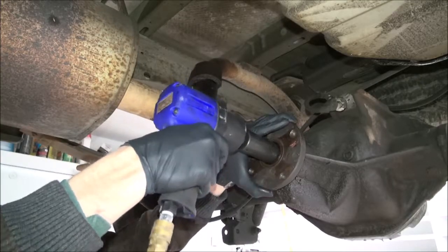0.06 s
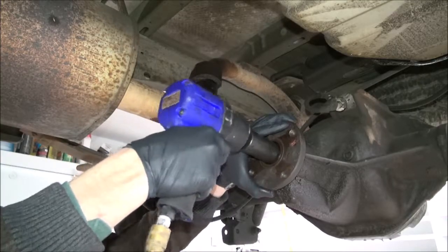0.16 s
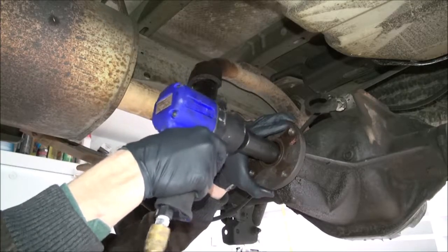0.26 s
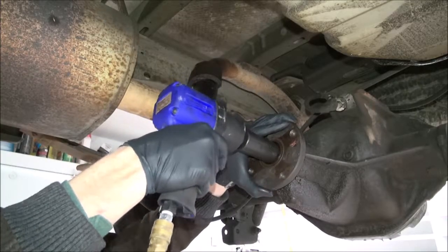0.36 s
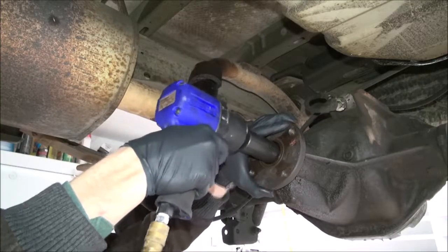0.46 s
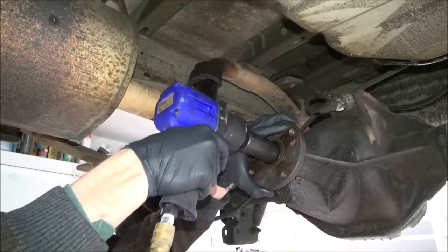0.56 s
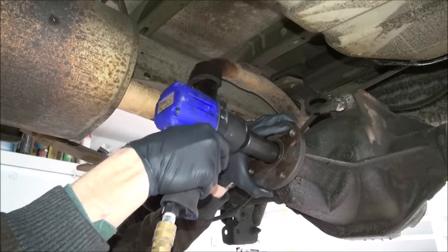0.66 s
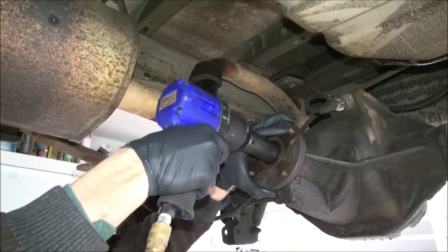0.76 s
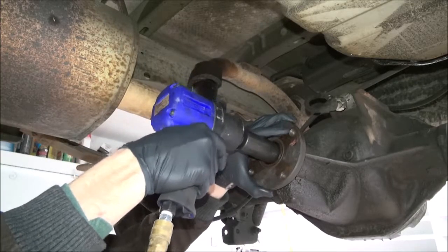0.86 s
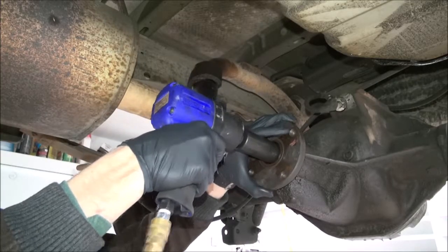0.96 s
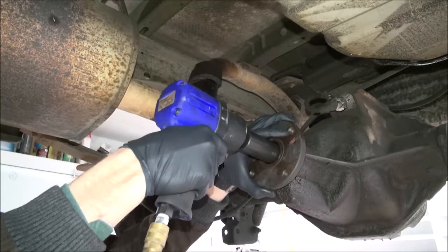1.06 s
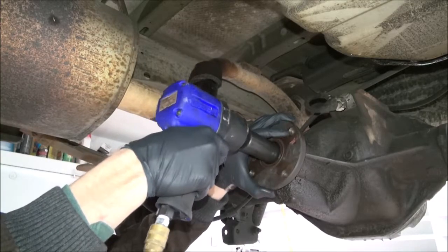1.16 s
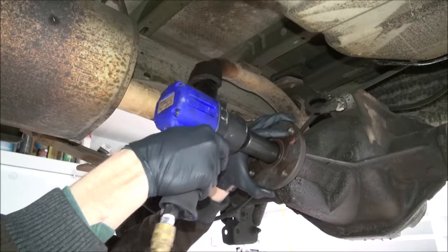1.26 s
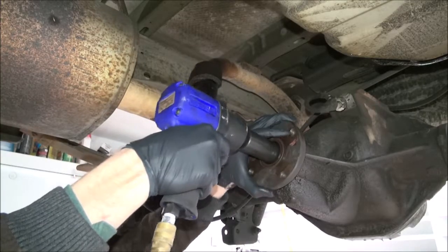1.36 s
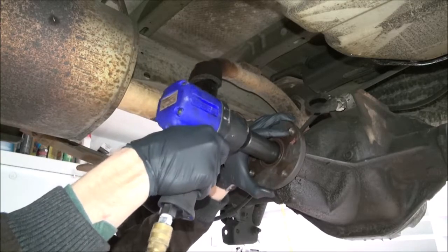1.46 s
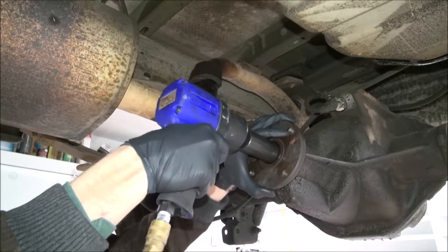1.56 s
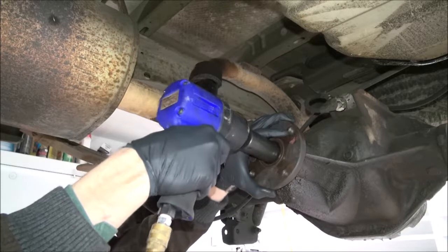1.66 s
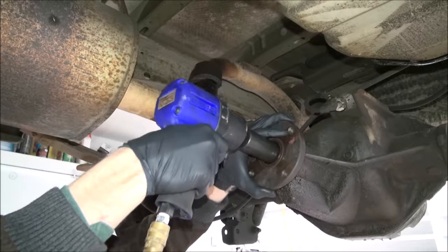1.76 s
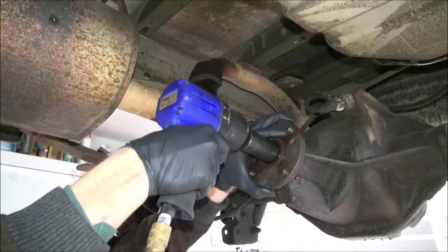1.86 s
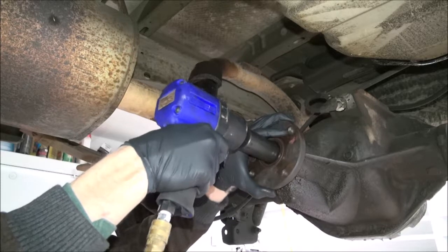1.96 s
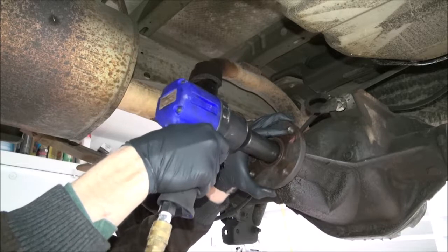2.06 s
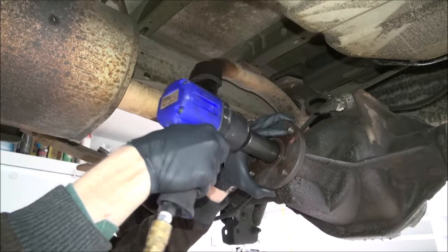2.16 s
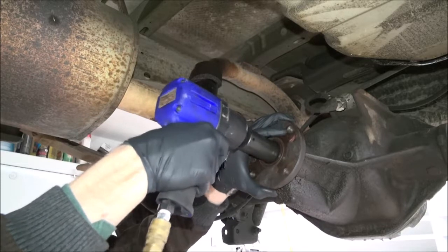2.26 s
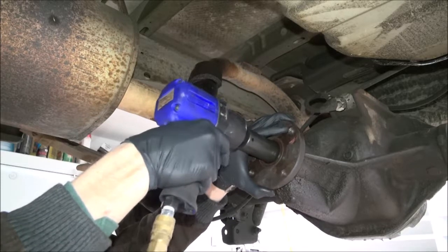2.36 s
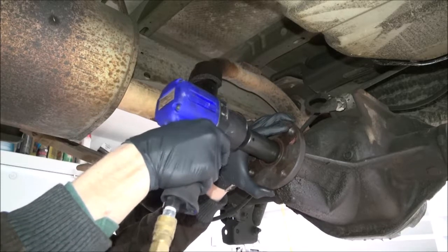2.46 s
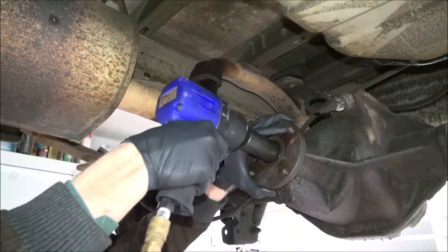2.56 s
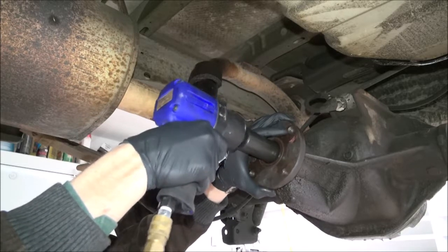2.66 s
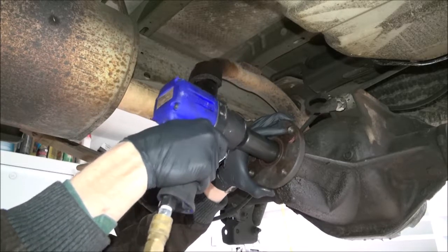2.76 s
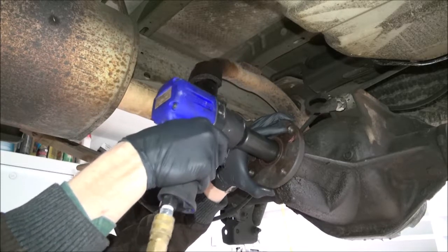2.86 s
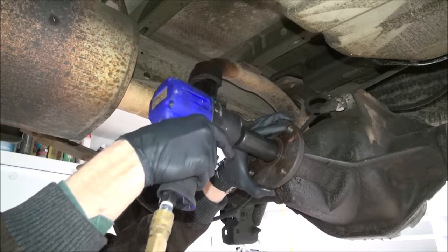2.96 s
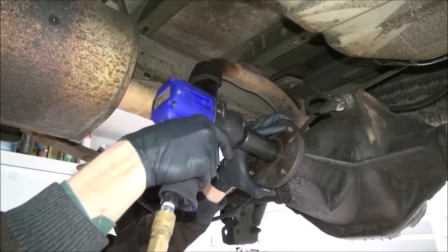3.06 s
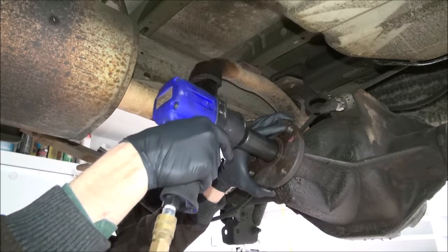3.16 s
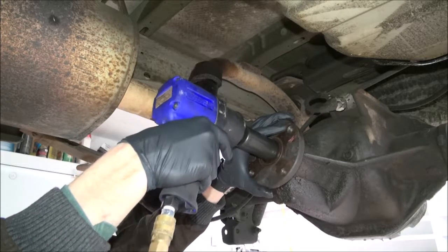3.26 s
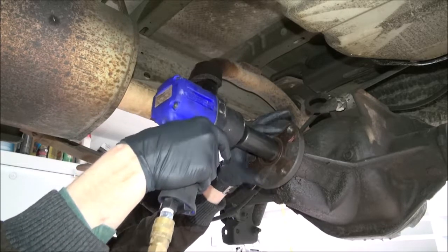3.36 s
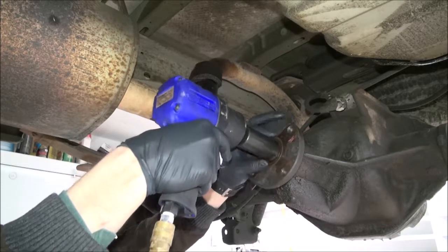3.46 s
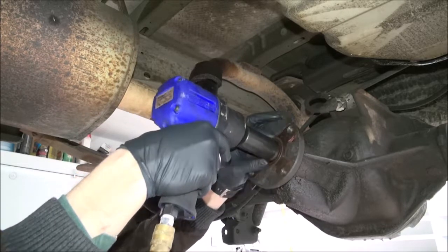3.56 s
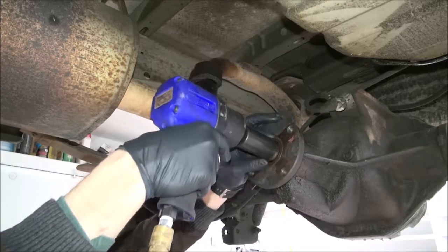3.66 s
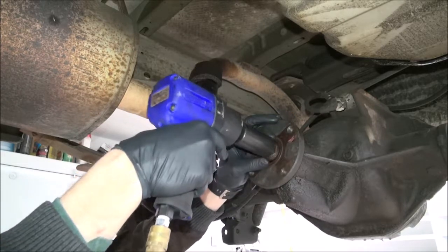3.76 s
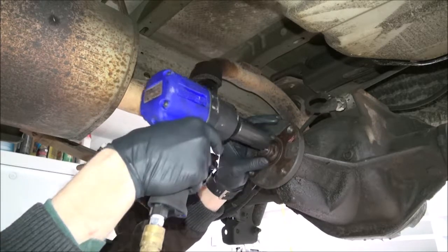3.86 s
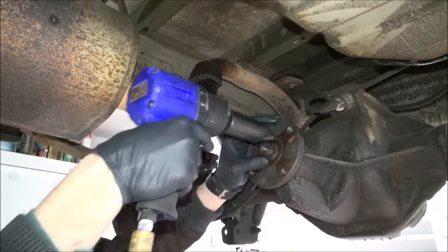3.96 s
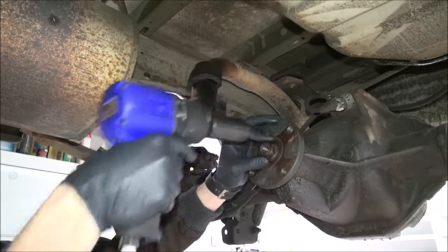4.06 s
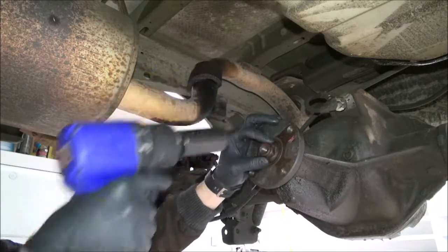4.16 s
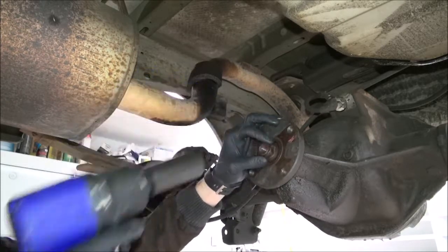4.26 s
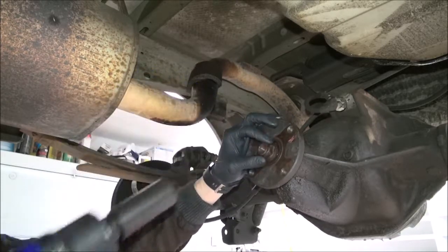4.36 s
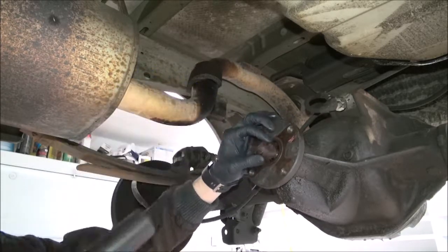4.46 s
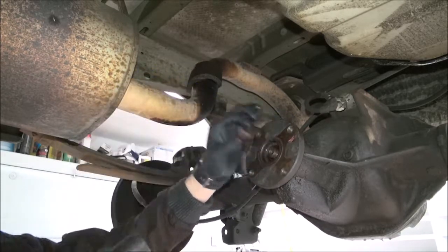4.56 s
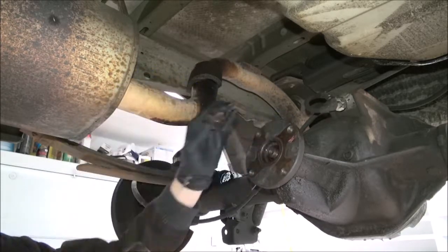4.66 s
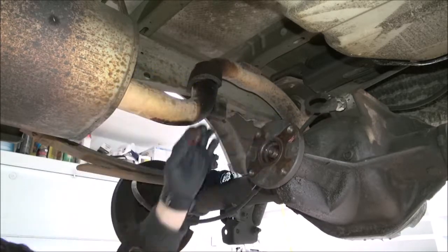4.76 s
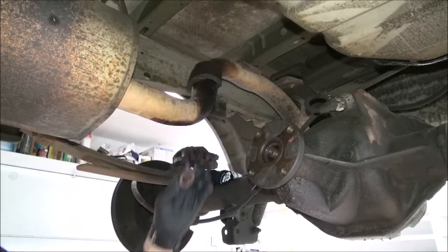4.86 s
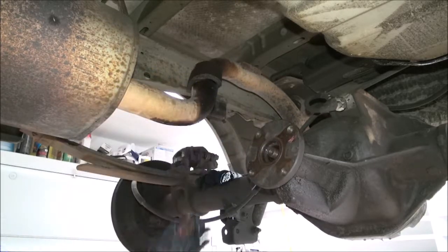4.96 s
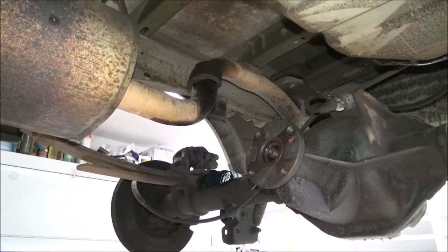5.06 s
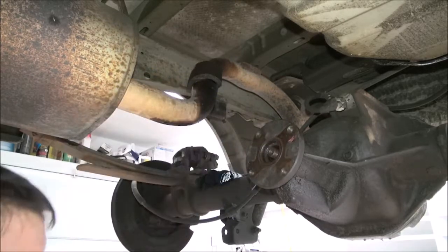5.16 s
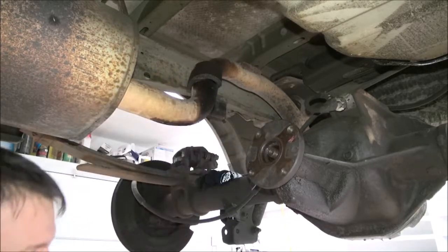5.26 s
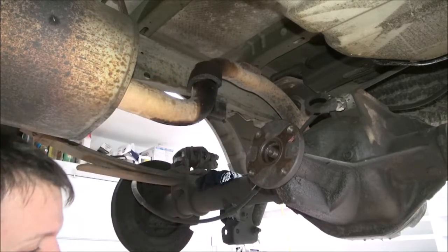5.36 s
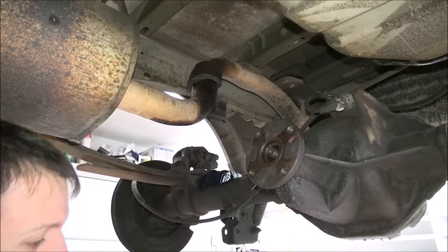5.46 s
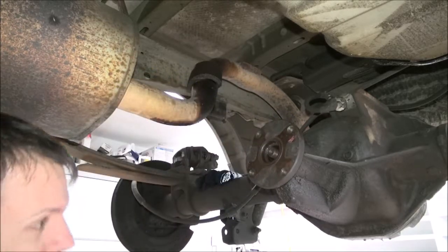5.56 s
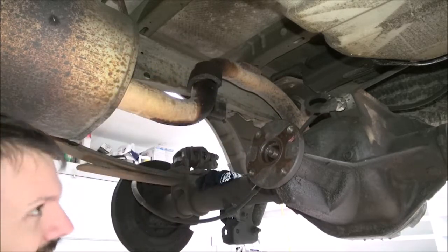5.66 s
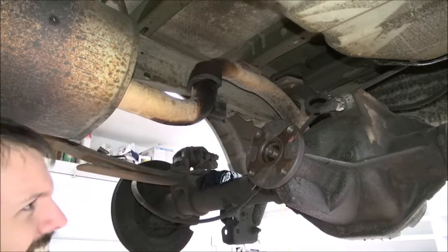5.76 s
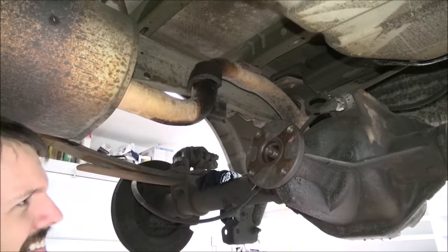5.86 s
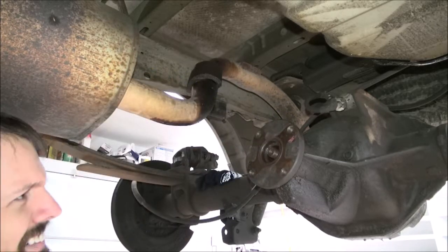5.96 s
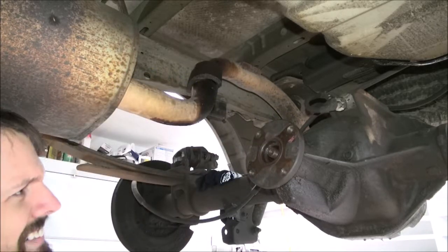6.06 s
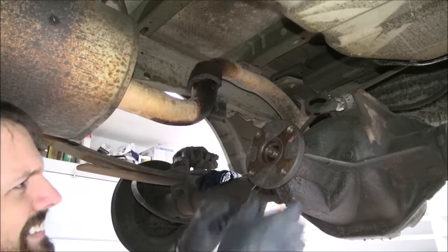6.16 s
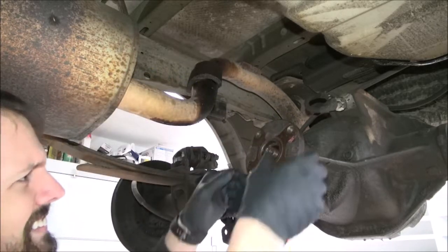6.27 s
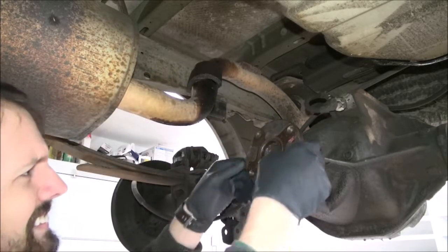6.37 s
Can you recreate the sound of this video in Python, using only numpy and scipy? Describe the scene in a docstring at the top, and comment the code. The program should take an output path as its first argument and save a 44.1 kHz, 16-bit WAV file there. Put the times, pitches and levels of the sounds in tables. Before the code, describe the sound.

Close by in a garage, an air impact wrench hammers on a screw under a car in several short bursts, with roaring air, a rattling socket and ringing steel. The motor then spins free, its whine rising and falling away as the loose socket clinks. Quiet taps and glove rustles follow over a low hum, and a steel part drops with a bright clang. The room adds a short echo.

```python
"""In a humming garage an air impact wrench hammers a puller screw under a car in short bursts, 26 blows
a second: its exhaust roars, its socket rattles and the axle rings. Near 2.6 s the motor spins free, and
its puffs of air make a whine that rises, then falls as it coasts to rest. Quiet taps and rustles of
handling follow, and the background noise steps up abruptly. At 5.75 s a steel part falls with a clang.
The garage echoes the knocks, and a limiter holds down the loudest peaks."""
import sys
import numpy as np
from scipy import signal
from scipy.fft import rfft, irfft, next_fast_len
from scipy.io import wavfile
from scipy.ndimage import uniform_filter1d, minimum_filter1d

SR = 44100
rng = np.random.default_rng(int(sys.argv[2]) if len(sys.argv) > 2 else 0)


def dump(signal):
    """Clip the signal to [-1, 1] and save it as 16-bit WAV at the path in sys.argv[1]."""
    limited = np.clip(np.atleast_2d(signal).T, -1, 1)
    pcm = np.round(limited * 32767).astype(np.int16)
    wavfile.write(sys.argv[1], SR, pcm)


N = 283122
TOP_HZ = 15950  # the highest frequency kept


def amp(db):
    """Turn decibels into a number to multiply by."""
    return 10 ** (np.asarray(db) / 20)


def along(points, hz):
    """Read between the rows of a (frequency, value) table, on a log frequency scale."""
    freqs, values = np.transpose(points)
    return np.interp(np.log(hz + 1), np.log(freqs + 1), values)


def curve(points):
    """Join the rows of a (time, value) table with straight lines, one value per sample."""
    return np.interp(np.arange(N) / SR, *np.transpose(points))


def filtered(x, response):
    """Turn each frequency of x up or down by the gain response(hz)."""
    n = x.shape[-1]
    padded = next_fast_len(n + 4096)
    return irfft(rfft(x, padded) * response(np.fft.rfftfreq(padded, 1 / SR)), padded)[..., :n]


def coloured(x, spectrum, size=4096):
    """Give x the tone colour of a table; white noise keeps its overall power."""
    cepstrum = irfft(np.log(amp(along(spectrum, np.fft.rfftfreq(size, 1 / SR)))))
    cepstrum[1:size // 2] *= 2  # folded so that the filter rings only after a hit
    cepstrum[size // 2 + 1:] = 0
    response = irfft(np.exp(rfft(cepstrum)))
    response /= np.linalg.norm(response)
    return signal.fftconvolve(x, np.atleast_2d(response), axes=1)[:, :x.shape[1]]


# how wide the noise sounds: (frequency [Hz], side level over middle [dB])
STEREO_WIDTH = [(60, -15.5), (250, -25.5), (2400, -23.5), (4400, -11), (6500, -3.5), (8200, 3),
                (15000, 1.5)]
def noise(n):
    """Stereo noise: left and right are alike in the bass and differ in the treble."""
    mid, side = rng.standard_normal((2, n))
    side = filtered(side, lambda hz: amp(along(STEREO_WIDTH, hz)))
    return np.array([mid + side, mid - side])


def add(track, s, sound):
    """Mix a sound into a track from second s on."""
    start = max(round(s * SR), 0)
    part = track[..., start:start + sound.shape[-1]]
    part += sound[..., :part.shape[-1]]


def ring(modes, t, scatter_db, count=1):
    """Struck steel rings with its own fading tones, in a slightly new mix for each blow."""
    hz, db, t60 = np.transpose(modes)  # t60, the fade time: seconds to drop by 60 dB
    strength = amp(db + scatter_db * rng.standard_normal((count, len(hz))))
    phase = np.exp(2j * np.pi * rng.random(strength.shape))
    tones = amp(-60 * t / t60[:, None]) * np.exp(2j * np.pi * hz[:, None] * t)
    return np.squeeze(((strength * phase) @ tones).imag)


# how long the garage echoes: (frequency [Hz], fade time [s])
ECHO_FADE = [(100, 0.17), (300, 0.32), (1500, 0.41), (5000, 0.32), (14000, 0.16)]
def garage(x, wet_db, delay_s=.004):
    """Add the echo from the walls and the car's underside; middle frequencies last longest."""
    hz, t, bands = signal.stft(noise(SR * 3 // 4), SR, nperseg=256)
    tail = signal.istft(bands * amp(-60 * t / along(ECHO_FADE, hz)[:, None]), SR, nperseg=256)[1]
    tail /= np.linalg.norm(tail.mean(0))
    tail = np.pad(tail, ((0, 0), (round(delay_s * SR), 0)))
    return x + amp(wet_db) * signal.fftconvolve(x, tail, axes=1)[:, :N]


# tone colour of the quiet garage: (frequency [Hz], level [dB])
HUM_COLOUR = [(12, -63.5), (20, -32), (130, -2.5), (172, -16), (227, -5), (261, -17.5), (431, -15),
              (1950, -25), (15800, -48.5)]
def room_hum(level_db=-70.5):
    """A steady low hum lies under everything."""
    return amp(level_db) * coloured(noise(N), HUM_COLOUR)


# tone colours of the escaping air, high hiss and low roar: (frequency [Hz], level [dB])
HISS_COLOUR = [(350, -31.5), (600, 2.5), (679, -7.5), (789, -4), (1080, -0.5), (1650, -1), (2170, -2),
               (2600, 1), (3230, -4.5), (3650, 3), (4020, -7.5), (6230, -8.5), (8080, -19), (12000, -17),
               (15800, -28.5)]
ROAR_COLOUR = [(18, -57.5), (30, -25), (65, -24.5), (114, -1.5), (174, -9), (229, 2), (328, -3), (361, -2),
               (455, -3), (583, -2), (678, -9), (800, -10.5), (1040, -34), (1760, -120)]
# trigger pulls: (press [s], release [s], hiss level [dB], roar level [dB], roar pulsing [dB])
TRIGGER_PULLS = [(-0.06, 0.008, -12.5, -22, 0), (0.095, 0.302, -13.5, -24, 5.5),
                 (0.424, 0.585, -14, -21.5, 3.5), (0.715, 0.876, -14.5, -21.5, 3),
                 (0.97, 1.256, -12.5, -22.5, 4), (1.395, 2.273, -14.5, -24.5, 3.5),
                 (2.522, 2.825, -18.5, -28, 5.5)]
def exhaust(hiss_db=-3.5, roar_db=-0.5, rattle_db=-11, rattles_per_s=260, rattle_t60=0.018, dip_db=-2.5):
    """Air roars out of the wrench and is choked by each blow; the socket rattles in between."""
    presses, _, hiss_levels, roar_levels, pulse_depths = np.transpose(TRIGGER_PULLS)
    hiss_gain = airflow(hiss_levels, sag_db_per_s=6, fall_db_per_s=178)
    fizz_gain = airflow(hiss_levels, sag_db_per_s=6, fall_db_per_s=227.5)  # the treble dies first
    roar_gain = airflow(roar_levels, sag_db_per_s=2.5, fall_db_per_s=96.5)
    time, cycle = np.arange(N) / SR, hammer_cycle()
    depth_db = pulse_depths[np.searchsorted(presses, time) - 1]
    chuff = amp(-depth_db * (cycle > 0) * np.sin(2 * np.pi * (cycle + 0.027)))
    swing_dip = amp(dip_db * cycle ** 5)  # quieter as the hammer swings free just before it strikes
    jet = coloured(noise(N), HISS_COLOUR)
    fizz = filtered(jet, lambda hz: hz > 7000)
    hiss = amp(hiss_db) * (hiss_gain * (jet - fizz) + fizz_gain * fizz)
    contacts = (rng.random(N) < rattles_per_s / SR) * amp(2 * rng.standard_normal(N))
    energy_fade = amp(-120 * time[:SR // 10] / rattle_t60)
    energy = np.abs(signal.fftconvolve(contacts ** 2, energy_fade)[:N])
    chatter = np.sqrt(energy / energy.mean())
    rattle = amp(rattle_db) * hiss_gain * coloured(chatter * noise(N), CRACK_COLOUR)
    roar = amp(roar_db) * roar_gain * chuff * coloured(noise(N), ROAR_COLOUR)
    return swing_dip * (hiss + rattle) + roar


def airflow(levels_db, sag_db_per_s, fall_db_per_s, open_s=0.035, shut_db=10.5):
    """Strength of the air: the valve opens, hose pressure sags, and the flow dies on release."""
    time, gain = np.arange(N) / SR, np.zeros(N)
    for (on, off, *_), db in zip(TRIGGER_PULLS, levels_db):
        live = (time >= on) & (time < off + 1)
        t = time[live]
        valve_db = shut_db * np.clip(1 - ((t - on) / open_s) ** 2, 0, 1)
        loss_db = sag_db_per_s * (t - on) + fall_db_per_s * np.maximum(t - off, 0)
        gain[live] = np.maximum(gain[live], amp(db - valve_db - loss_db))
    return gain


# tones of the socket's body and of its thin rim: (frequency [Hz], level [dB], fade time [s])
SOCKET_TONES = [(1200, -8, .08), (1965, -9, .09), (2190, -12, .16), (2320, -10, .14), (3560, -8, .06),
                (4000, -7, .06), (4400, -8, .06), (6000, -13, .06)]
RIM_TONES = [(10000, 0, .07), (10300, -5, .06)]
# the socket hits the screw head: (time [s], clink level [dB], rim ping level [dB])
SOCKET_CLINKS = [(0.001, -18, -44), (2.656, -28.5, -26), (2.810, -25, -27), (2.839, -29, -29),
                 (2.941, -21, -38.5), (3.1244, -38.5, -62), (3.172, -33, -56), (3.349, -51, -79.5),
                 (3.450, -56, -79.5), (3.494, -53.5, -75)]
def socket(click_t60=.05, body_db=-6):
    """With no load on it, the loose socket clicks and jingles on the screw head."""
    t = np.arange(SR // 2) / SR
    clicks, steel = np.zeros(N), np.zeros(N)
    for s, db, ping_db in SOCKET_CLINKS:
        add(clicks, s, amp(db - 60 * t / click_t60))
        add(steel, s, amp(db + body_db) * ring(SOCKET_TONES, t, scatter_db=2))
        add(steel, s, amp(ping_db) * ring(RIM_TONES, t, scatter_db=2))
    return garage(coloured(clicks * noise(N), CRACK_COLOUR) + steel, wet_db=-9)


# tone colour of steel hitting steel, shared with the socket: (frequency [Hz], level [dB])
CRACK_COLOUR = [(60, -34.5), (300, -19), (700, -1.5), (1500, 1), (2600, 1.5), (3200, -1), (3700, 0),
                (4500, -2), (6400, -1), (8200, -18.5), (11500, -16.5), (16000, -26.5)]
# tones of the screw and axle: (frequency [Hz], level [dB], fade time [s])
AXLE_TONES = [(235, -8, .25), (490, -23, 1.3), (580, -9, .35), (953, -11, .15), (1108, -11, .15),
              (1305, -7, .12), (1477, -7, .15), (1587, -7, .2), (1715, -4, .2), (1958, -6, .12),
              (2429, 1, .07), (2595, 2, .06), (2795, 0, .07), (3100, -1, .06), (3660, 2, .06),
              (3745, 0, .07), (4235, -3, .06), (6223, -2, .07)]
# single knocks as the motor starts, slips or coasts: (time [s], level [dB], extra ring [dB])
LONE_KNOCKS = [(0.0014, -8.5, 11), (0.0112, -8.5, 11.5), (0.1198, -7.5, -1.5), (0.9825, -9, -1),
               (2.3519, -9.5, -6), (2.585, -6.5, 11), (2.7543, -5, 0.5), (2.808, -12.5, -2)]
# bursts of blows: (first blow [s], last blow [s], time lost finding the rhythm [s], level [dB])
BURSTS = [(0.1421, 0.263, -0.0056, -4), (0.4443, 0.5536, -0.025, -5.5), (0.7328, 0.8741, -0.009, -2.5),
          (0.9906, 1.2572, 0.0016, -3), (1.4383, 1.6425, 0.0136, -0.5), (1.6811, 1.795, -0.00094, 2.5),
          (1.8348, 1.9464, -0.0032, -3.5), (1.9881, 2.1405, 0, -0.5), (2.1856, 2.2647, -0.0033, -3),
          (2.535, 2.6877, 0.014, -4.5)]
def hammer(crack_db=-6.5, crack_t60=0.028, ring_db=-26, scatter_db=3.23, bounce_s=0.021, bounce_db=-9):
    """Each blow cracks and rings the axle; in a burst the hammer bounces and knocks again lightly."""
    t = np.arange(SR * 3 // 2) / SR
    force, steel = np.zeros(N), np.zeros(N)
    snap = amp(4 - 60 * t / 0.0049)
    shape = (snap + amp(-60 * t / crack_t60)) * (1 - np.exp(-t / .0005))
    blows = [(s, db + rng.normal(0, scatter_db))
             for first, last, lost, db in BURSTS for s in blow_times(first, last, lost)]
    for s, db in blows:
        add(force, s + bounce_s + rng.normal(0, 0.0022), amp(db + bounce_db) * shape)
    hits = [(s, db, 0) for s, db in blows] + list(LONE_KNOCKS)
    for (s, db, extra_db), tone in zip(hits, ring(AXLE_TONES, t, scatter_db=5.5, count=len(hits))):
        add(force, s, amp(db) * shape)
        add(steel, s, amp(db + ring_db + extra_db) * tone)
    return garage(amp(crack_db) * coloured(force * noise(N), CRACK_COLOUR) + steel, wet_db=-7)


def blow_times(first, last, lost, gap_s=0.0385, settle_blows=1.5):
    """The hammer settles into an even rhythm within a few blows."""
    blow = np.arange(round((last - first) / gap_s) + 1)
    late = lost * (1 - np.exp(-blow / settle_blows))
    return first + late + (last - first - late[-1]) * blow / blow[-1]


def hammer_cycle():
    """How far the hammer is from one blow to the next, 0 to 1; 0 between bursts."""
    time, cycle = np.arange(N) / SR, np.zeros(N)
    for first, last, lost, _ in BURSTS:
        at = blow_times(first, last, lost)
        cycle += np.interp(time, at, np.arange(len(at))) % 1
    return cycle


# tone colours of a steel tick and a dull thud: (frequency [Hz], level [dB])
TICK_COLOUR = [(100, -14), (600, 9.5), (2300, 0), (5000, -10.5), (15000, -38)]
THUD_COLOUR = [(40, -36.5), (130, -6.5), (220, -1.5), (400, -7.5), (900, -26.5), (4000, -54.5)]
# the tool takes up the load; later, gloves and puller touch: (time [s], level [dB], extra thud [dB])
HANDLING_TAPS = [(0.122, -2, -7), (0.132, -1.5, -5), (0.168, -7, -3), (3.638, -50.5, -18),
                 (3.809, -50, -19), (4.158, -43.5, -6.5), (4.53, -49.5, -14.5), (4.619, -52, -12),
                 (5.617, -40.5, 11), (5.633, -39, -6), (5.705, -53, 22.5), (6.049, -34.5, -6),
                 (6.089, -43, 5), (6.37, -48, -11.5)]
def handling(level_db=-8, tick_t60=0.023, thud_t60=0.057):
    """Each contact makes a short tick of steel over a dull thud."""
    t = np.arange(SR // 4) / SR
    ticks, thuds = np.zeros(N), np.zeros(N)
    for s, db, extra_db in HANDLING_TAPS:
        add(ticks, s, amp(db + level_db - 60 * t / tick_t60))
        add(thuds, s, amp(db + extra_db + level_db - 60 * t / thud_t60))
    taps = coloured(ticks * noise(N), TICK_COLOUR) + coloured(thuds * noise(N), THUD_COLOUR)
    return garage(taps, wet_db=-3)


# the freed motor speeds up: (time [s], vanes passing the air outlet [Hz])
SPIN_UP_RATES = [(2.55, 200.8), (2.75, 433), (2.85, 516), (2.875, 508.3)]
def vane_rate(friction_per_s=4.35, drag_hz=892, stop_s=3.59, stopping_s=0.09):
    """Vanes (motor blades) passing per second: they speed up, then friction and air drag stop them."""
    time = np.arange(N) / SR
    driven = curve(SPIN_UP_RATES)
    slowing = np.exp(-friction_per_s * np.maximum(time - SPIN_UP_RATES[-1][0], 0))
    rate = driven * slowing / (1 + driven / drag_hz * (1 - slowing))  # drag equals friction at drag_hz
    return rate * np.clip((stop_s - time) / stopping_s, 0, 1) * (time > SPIN_UP_RATES[0][0])


# tone colour of the air outlet: (frequency [Hz], level [dB])
OUTLET_COLOUR = [(40, -24), (120, 1), (180, 1.5), (225, 5), (300, 4), (480, -1), (700, -7), (1000, 2),
                 (1300, -3), (1700, -13), (2300, -11), (3500, -28), (12000, -42)]
# how the whine swells and fades: (time [s], level [dB])
WHINE_LEVELS = [(2.55, -52.5), (2.7, -32.5), (2.88, -20.5), (2.96, -21.5), (3.025, -25), (3.06, -29),
                (3.31, -41), (3.37, -56), (3.56, -87)]
def motor_whine(level_db=-0.5, hum_db=7, hum_hz=221, jitter=0.015):
    """Each vane lets out one puff of air: fast puffs blend into a whine, slow ones sound singly."""
    rate = vane_rate()
    vanes_passed = np.cumsum(rate) / SR
    at = np.flatnonzero(np.diff(np.floor(vanes_passed)))
    at = at[at < WHINE_LEVELS[-1][0] * SR]
    gap = SR / (rate + 1)  # samples between puffs
    at += np.round(jitter * rng.standard_normal(len(at)) * gap[at]).astype(int)  # slightly uneven vanes
    puff_db = curve(WHINE_LEVELS) + level_db + rng.standard_normal(N)
    puffs = np.zeros(N)
    puffs[at] = amp(puff_db[at]) * np.sqrt(gap[at])
    # a slow vane opens the outlet gently, so its puff is dull and only sets the air passage humming
    sharpness = np.clip(rate / 300, 0, 1) ** 1.1
    hum = signal.lfilter(*signal.iirpeak(hum_hz, Q=7, fs=SR), puffs)
    flow = sharpness * puffs + (1 - sharpness) * amp(hum_db) * hum
    return garage(coloured(np.array([flow, flow]), OUTLET_COLOUR), wet_db=-9.5)


# tone colour of the thin air stream: (frequency [Hz], level [dB])
TRICKLE_COLOUR = [(820, -37), (1400, -4.5), (1840, -10.5), (2260, -2), (3250, -22), (3860, -11.5),
                  (4830, -24.5), (5910, -23), (8340, -34.5), (12500, -24.5), (15800, -27)]
def air_trickle(air_db=-35, rumble_db=-37, pulsing=0.23):
    """The free motor pumps a thin stream of air that pulses with the vanes and fades as they slow."""
    rate = vane_rate()
    pulse = 1 + pulsing * np.cos(2 * np.pi * np.cumsum(rate) / SR)
    flow = (rate / SPIN_UP_RATES[-1][1]) ** 1.1 * pulse
    air = amp(air_db) * coloured(noise(N), TRICKLE_COLOUR)
    rumble = amp(rumble_db) * coloured(noise(N), ROAR_COLOUR)
    return flow * (air + rumble)


# tone colour of the rustle and the added background noise: (frequency [Hz], level [dB])
BACKGROUND_COLOUR = [(53, -27), (90, 2.5), (172, -8), (223, -5), (508, -10), (1110, -9.5), (14200, -41),
                     (15800, -39.5)]
# gloves and sleeves move: (time [s], half length [s], level [dB])
SLEEVE_RUSTLES = [(4.633, 0.05, -65.5), (6.129, 0.12, -58)]
def rustle_and_background_step(step_s=5.167, settled_db=-60.5, extra_db=2.5, settle_s=0.13):
    """Gloves and sleeves rustle; the background noise steps up abruptly, then settles a little."""
    time = np.arange(N) / SR
    rustle = sum(amp(db) * np.exp(-((time - s) / half) ** 2) for s, half, db in SLEEVE_RUSTLES)
    since = np.maximum(time - step_s, 0)
    step = (since > 0) * amp(settled_db + extra_db * np.exp(-since / settle_s))
    return np.hypot(rustle, step) * coloured(noise(N), BACKGROUND_COLOUR)


# tone colour of the steel part's landing: (frequency [Hz], level [dB])
CLASH_COLOUR = [(60, -37), (200, -13), (310, -1.5), (500, -4), (1100, -1), (1800, 2), (2400, 0),
                (4200, -3.5), (6200, -8), (8500, -29.5), (16000, -29)]
# tones of the steel part: (frequency [Hz], level [dB], fade time [s])
PART_TONES = [(232, -11, .1), (318, -8, .22), (365, -8, .2), (541, -12, .19), (778, -3.5, .22),
              (998, -8, .15), (1066, -6, .35), (1103, -2, .14), (1130, -6, .28), (1328, -5, .2),
              (1455, -3, .16), (1550, -6, .2), (1717, 0.5, .25), (1759, -4, .26), (1830, -6, .33),
              (2072, -5, .14), (2258, -13, .28), (2707, -5, .23), (3024, -9, .22), (3400, -4, .09),
              (3635, -4, .15), (4040, -2, .11), (4587, -7, .25), (5916, -11, .14)]
# it grazes, lands and tips over: (time [s], level [dB], treble limit [Hz], bass limit [Hz])
FALL_HITS = [(5.746, -33.5, 5061, 2517), (5.7534, -6, 7036, 684.5), (5.7627, -11, 4099, 989),
             (5.777, -6.5, 2158, 119.9), (5.786, -13.5, 1500, 194.1)]
def clang(clash_t60=0.092, clash_db=-1, ring_db=-8):
    """The falling steel part strikes brightly on an edge, then more dully on its side."""
    t = np.arange(SR * 2 // 3) / SR
    out = np.zeros((2, N))
    for s, db, treble_hz, bass_hz in FALL_HITS:
        clash = coloured(amp(clash_db - 60 * t / clash_t60) * noise(len(t)), CLASH_COLOUR)
        steel = amp(ring_db) * ring(PART_TONES, t, scatter_db=0.5)
        hit = (clash + steel) * (1 - np.exp(-t / .001))
        band = signal.butter(1, [bass_hz, treble_hz], "bandpass", fs=SR)
        add(out, s, amp(db) * signal.lfilter(*band, hit))
    return garage(out, wet_db=-11)


# left-right balance: (frequency [Hz], left level over right [dB])
BALANCE = [(60, 2.5), (400, 2), (1300, 1.47), (2400, 1), (4400, 1), (8000, 2.5), (14000, -2.14)]
def scene():
    """Mix all the sounds and place them a little left of centre."""
    wrench = hammer() + exhaust() + air_trickle() + motor_whine() + socket()
    mix = wrench + handling() + clang() + room_hum() + rustle_and_background_step()
    return filtered(mix, lambda hz: amp(np.outer([.5, -.5], along(BALANCE, hz))))


def record(dry, ceiling=0.844):
    """A limiter briefly turns down the loudest peaks; the very highest treble is cut off."""
    needed = np.minimum(1, ceiling / (np.abs(dry).max(0) + 1e-9))
    gain = uniform_filter1d(minimum_filter1d(needed, size=129), size=65)
    return filtered(dry * gain, lambda hz: hz < TOP_HZ)


dry = scene()
out = record(dry)
dump(out)
```